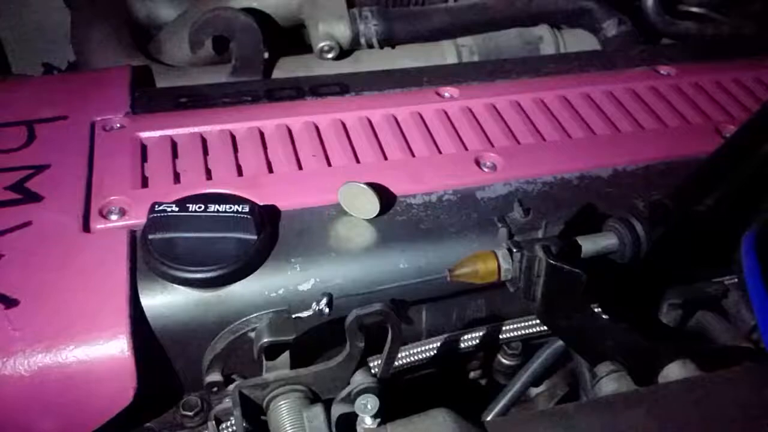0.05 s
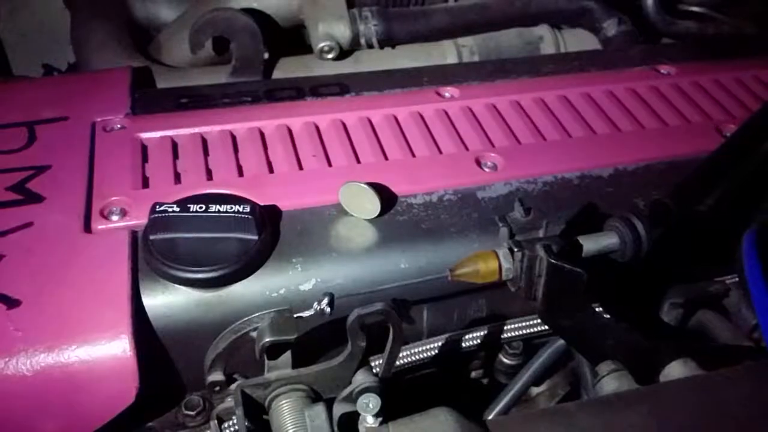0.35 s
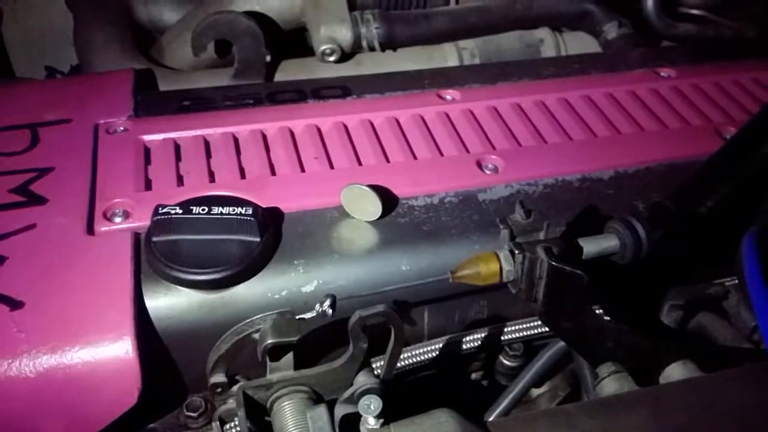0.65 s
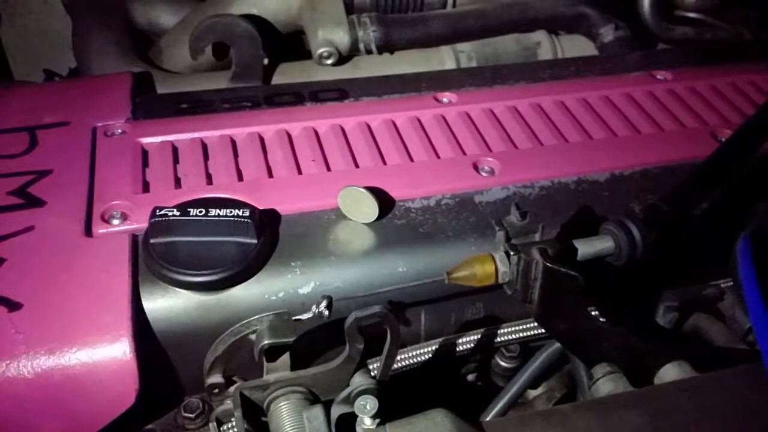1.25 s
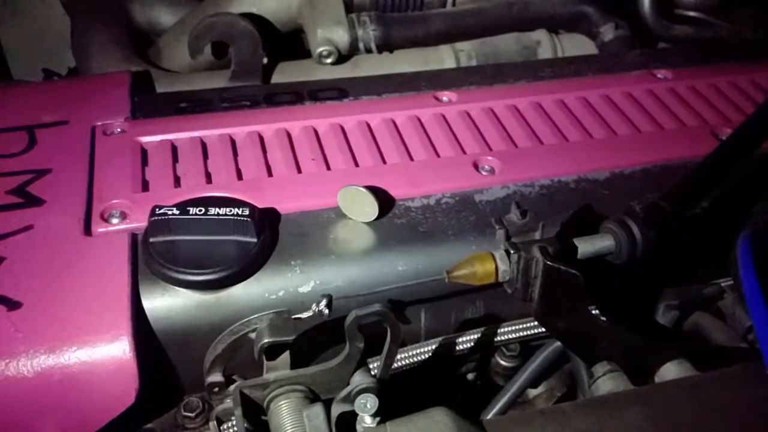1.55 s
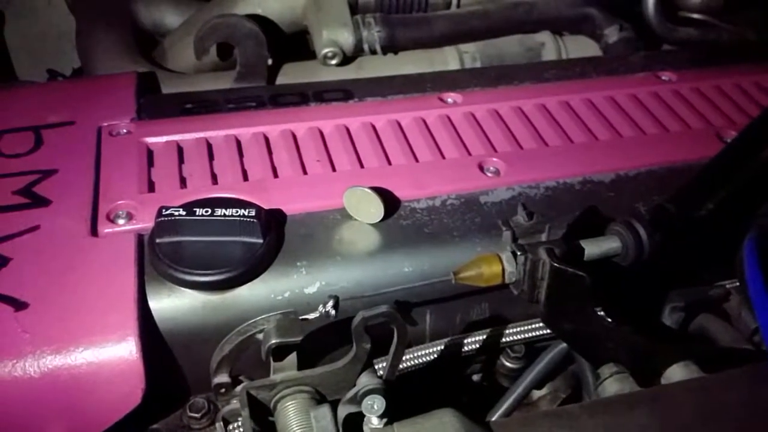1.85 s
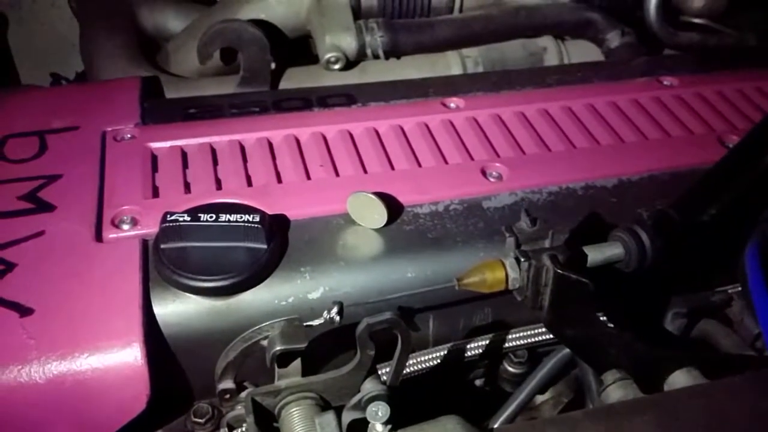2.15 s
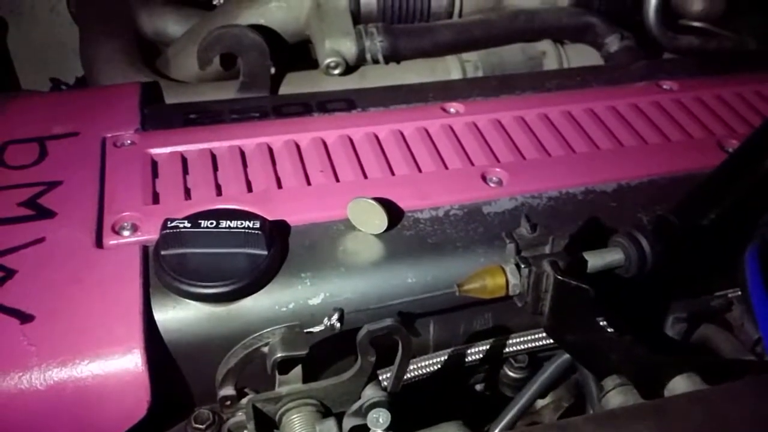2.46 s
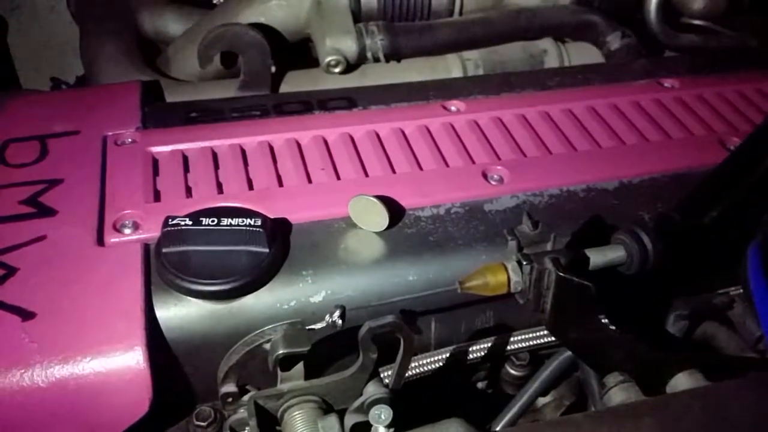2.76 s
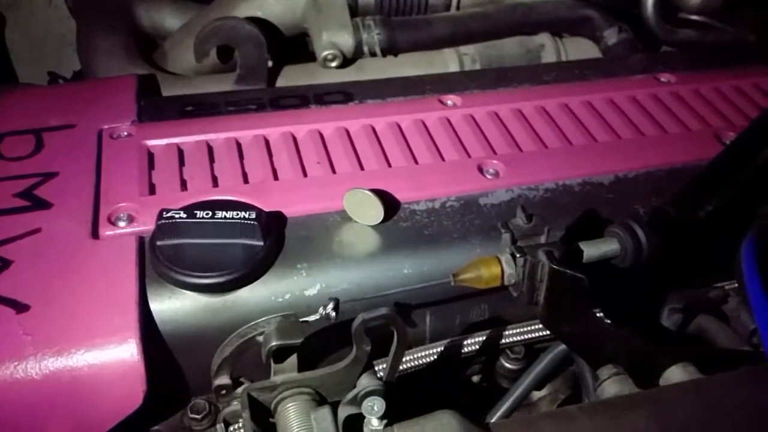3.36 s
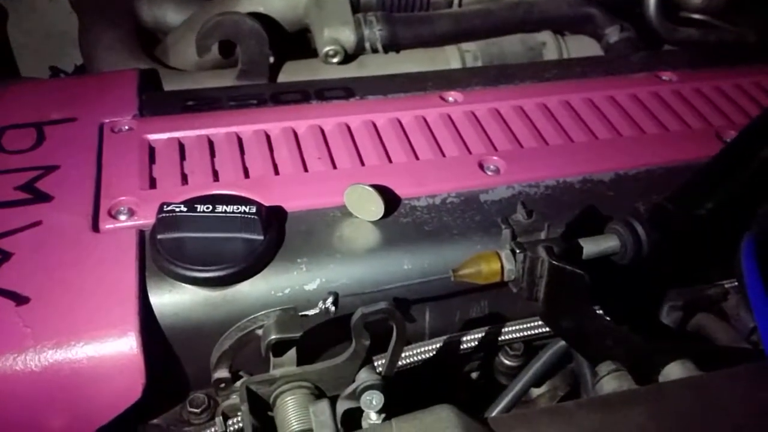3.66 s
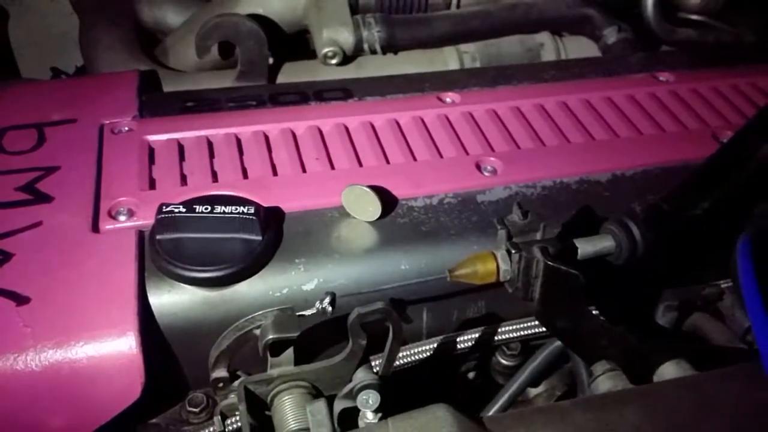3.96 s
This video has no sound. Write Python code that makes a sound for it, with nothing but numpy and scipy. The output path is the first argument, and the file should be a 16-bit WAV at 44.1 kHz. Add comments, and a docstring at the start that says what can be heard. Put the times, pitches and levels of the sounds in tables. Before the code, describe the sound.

A car engine idles, heard close under the open bonnet. It fades in over the first second, then holds a deep, pulsing rumble with rapid, regular sharp ticks. Behind these, valves clatter, a faint high sizzle comes and goes, and belts whine softly. At about 1.3 seconds a brief rasp swells and dies away. The engine keeps idling steadily until the end at 4 seconds.

```python
"""A six-cylinder petrol engine idles at about 660 rpm, heard close up under the open bonnet.
The sound fades in during the first second. From then on, firing pulses make a deep rumble, and three
different sharp ticks, probably injectors, take turns in every engine cycle (two turns of the crank).
Behind them the valves clatter, a faint sizzle comes and goes, and belt-driven parts whine softly.
At about 1.3 s a rasp swells briefly; the engine idles on to the end, at 4 s."""
import sys
import numpy as np
from scipy import signal
from scipy.fft import rfft, irfft
from scipy.io import wavfile
from scipy.ndimage import uniform_filter1d

SR = 44100
rng = np.random.default_rng(int(sys.argv[2]) if len(sys.argv) > 2 else 0)


def transcribe(u):
    """Save the signal u as a 16-bit wav file named by the first command-line argument.

    u: samples, shape (n,) or (channels, n), limited to [-1, 1]; the rate is SR.
    q: integer samples, one column per channel.
    """
    v = np.clip(np.atleast_2d(u).T, -1, 1)
    q = np.round(v * 32767).astype(np.int16)
    wavfile.write(sys.argv[1], SR, q)


N = 176400
TIME_S = np.arange(N) / SR
FREQS_HZ = np.fft.rfftfreq(N, 1 / SR)


def amp(db):
    """Turn decibels into a gain."""
    return 10 ** (np.asarray(db) / 20)


def unit(x):
    """Scale a signal to an average strength (rms) of 1."""
    return x / np.sqrt(np.mean(x ** 2) + 1e-20)


def gain_at(colour, hz):
    """Look up the gain at a pitch in a table of pitch_hz, level_db."""
    pitches, db = np.transpose(colour)
    return amp(np.interp(np.log(np.maximum(hz, 1)), np.log(pitches), db))


def over_time(points):
    """Join points in time with straight lines."""
    return np.interp(TIME_S, *np.transpose(points))


def noise(colour):
    """Noise with the given colour, its balance of low and high pitches."""
    return unit(irfft(rfft(rng.standard_normal(N)) * gain_at(colour, FREQS_HZ), N))


def drift(rate_hz):
    """A smooth random wobble, mostly slower than rate_hz."""
    return unit(irfft(rfft(rng.standard_normal(N)) * (FREQS_HZ > 0) / (1 + (FREQS_HZ / rate_hz) ** 4), N))


def clicks(times, gains):
    """One tiny click at each time."""
    out = np.zeros(N)
    out[np.clip((times * SR).astype(int), 0, N - 1)] = gains
    return out


def stereo(mid, side):
    """Make left and right from what they share (mid) and what sets them apart (side)."""
    return np.array([mid + side, mid - side])


# How wide the sound is: pitch_hz, side_over_mid_db
STEREO_WIDTH = [(60, -60), (130, -47), (400, -46), (1000, -41), (1900, -52), (2800, -29.5), (4000, -12.5),
                (6000, -7), (9000, -7), (14000, -0.5)]

def wide_noise(colour):
    """Stereo noise that widens towards the treble."""
    side = irfft(rfft(noise(colour)) * gain_at(STEREO_WIDTH, FREQS_HZ), N)
    return stereo(noise(colour), side)


# When each engine cycle begins: start_s
CYCLE_STARTS = [(0.0466), (0.2278), (0.4091), (0.5891), (0.769), (0.95), (1.131), (1.3129), (1.4936),
                (1.6747), (1.8535), (2.0338), (2.2149), (2.3954), (2.5759), (2.7565), (2.9368), (3.1181),
                (3.2975), (3.4778), (3.6598), (3.8396), (4.0205)]
CYLINDERS = 6

def count_firings():
    """How many firings have gone by at each moment; every cylinder fires once a cycle."""
    return CYLINDERS * np.interp(TIME_S, CYCLE_STARTS, np.arange(len(CYCLE_STARTS)))


def each_cycle(place):
    """The times when the engine passes one place in its cycle, counted in firings from 0 to 6."""
    cycles = np.arange(len(CYCLE_STARTS))
    times = np.interp(cycles + place / CYLINDERS, cycles, CYCLE_STARTS)
    return times[(times > CYCLE_STARTS[0]) & (times < N / SR - .01)]


def bumps(place, half_s):
    """A smooth rise and fall around the same place in every cycle."""
    times = each_cycle(place)
    nearest = times[np.searchsorted((times[1:] + times[:-1]) / 2, TIME_S)]
    return np.exp(-((TIME_S - nearest) / half_s) ** 2)


# Tones of the belt-driven parts: pitch_hz, level_db, wobble_share, roughness_hz
BELT_TONES = [(399, -47.5, .003, 5), (801, -51, .004, 6), (915, -48.5, .001, 3), (1146, -53.5, .003, 4),
              (1954, -44, .004, 7), (2697, -47, .002, 6), (2985, -46, .004, 22), (3666, -53, .002, 12),
              (5472, -52, .0004, 3)]

def belt_whines():
    """Thin, rough tones that wobble together with the speed of the belt."""
    belt, out = drift(3.544), 0
    for hz, db, wobble, roughness_hz in BELT_TONES:
        pitch_hz = hz * (1 + wobble * belt) + roughness_hz * drift(39.6)
        tone = np.sin(2 * np.pi * np.cumsum(pitch_hz) / SR)
        out = out + amp(db) * unit(tone * (1 + .29 * drift(21)))
    return out


# Colour of the sizzle: pitch_hz, level_db
SIZZLE_COLOUR = [(7000, -30), (8200, 2), (9300, -0.5), (10200, 1.5), (10700, -16)]
# Its bursts in each cycle: place_firings, level_db
SIZZLE_BURSTS = [(.45, -44), (1.5, -42.5), (2.45, -48), (3.52, -42.5), (5.45, -45.5)]

def sizzle():
    """Faint bursts of high hiss between the ticks."""
    level = sum(amp(db) * bumps(place, half_s=.0072) for place, db in SIZZLE_BURSTS)
    return level * wide_noise(SIZZLE_COLOUR)


# Colour of the rasp: pitch_hz, level_db
RASP_COLOUR = [(1500, -25), (1900, -5), (2200, 2), (2500, -10), (3000, -12), (4000, -26)]

def rasp(peak_s=1.295, half_s=.056, level_db=-33):
    """A mid-pitched rasp swells once and dies away."""
    return amp(level_db) * np.exp(-((TIME_S - peak_s) / half_s) ** 2) * noise(RASP_COLOUR)


# Colour of the rattling cams and valves: pitch_hz, level_db
RATTLE_COLOUR = [(400, -13), (520, -15), (640, -3.5), (800, -3.5), (1050, -9), (1400, -11.5), (1750, -8.5),
                 (1950, -3), (2170, -3.5), (2290, -6), (2700, 0.5), (3000, 0.5), (3300, -5), (3700, -4),
                 (4300, -7.5), (4700, -11.5), (5200, -8.5), (5500, -9.5), (5800, -4.5), (6150, -13.5),
                 (6600, -12), (8000, -19), (9500, -21), (11000, -24), (13000, -23.5), (15500, -19.5)]
# Colour of one valve tap: pitch_hz, level_db
VALVE_TAP_COLOUR = [(600, -28), (1500, -22.5), (2200, -5), (2800, 0), (4200, 0.5), (5500, -9.5), (8500, -5),
                    (11000, -21), (15000, -19)]
# Valve taps in each cycle: place_firings, strength, half_length_s
VALVE_TAPS = [(.08, 1, .0015), (.95, 0.74, 0.00075), (1.05, 0.3, 0.0012), (2.06, 0.84, 0.0033),
              (2.55, 0.17, 0.0006), (3.0, 0.24, .003), (3.88, 0.63, 0.0025), (4.96, 0.61, 0.0018),
              (5.45, 0.41, .001), (5.84, 0.53, 0.0025)]

def valve_clatter(firings, rattle_db=-29, tap_db=-24.5):
    """Cams and valves rattle, a little louder with each firing, and single taps stand out."""
    pulse = 1 + .083 * np.cos(2 * np.pi * firings)
    rattle = pulse * amp(rattle_db + drift(210)) * wide_noise(RATTLE_COLOUR)
    taps = sum(strength * bumps(place, half_s) for place, strength, half_s in VALVE_TAPS)
    return rattle + taps * amp(tap_db + 3 * drift(8.5)) * wide_noise(VALVE_TAP_COLOUR)


# The tones that ring in each of the three ticks: pitch_hz, level_db
FIRST_TICK = [(2110, -13.5), (2713, -9), (3704, -0.7), (4264, -0.4), (5125, -10), (6589, -14.5),
              (7494, -7.5), (8226, -6), (9001, -6.5), (9302, -14.5), (13049, -15.5), (13609, -23),
              (14427, -10.5), (15116, -15), (15590, -25)]
SECOND_TICK = [(2153, -13), (2713, -7.2), (3618, -15.5), (3962, -19), (4264, -15), (4910, -14), (5857, -24),
               (6589, -8.5), (7407, -10), (7967, -6), (8829, -12.5), (9561, -44), (12791, -20),
               (13480, -38), (15375, -22.4)]
THIRD_TICK = [(2196, -14), (2756, -6), (3230, -19), (3531, -7), (3833, -14.5), (4393, -3.3), (5125, -5),
              (5728, -11.5), (6029, -19.5), (6891, -23), (7321, -26), (7967, -13.5), (8570, -9.5),
              (9044, -16), (9345, -28)]
# The ticks in turn: place_firings, level_db, lead_in_db, snap_db, rebound_after_s, rebound_db
TICK_TURNS = [(-.012, -13, -7, -25.5, .0052, -17), (1.985, -13.8, -4, -33, .0085, -13),
              (3.998, -13, -9, -34, .0085, -13)]
# Colour of the dry snap as parts meet: pitch_hz, level_db
SNAP_COLOUR = [(2500, -30), (5000, -10), (6500, -6), (9000, 4.5), (10500, -5), (12000, -13), (14200, 5),
               (15800, 0)]

def ticks(lead_s=.0013, ring_s=.009, path_spread_s=.0003):
    """A lead-in click, a main click and a weak rebound set small parts ringing, with a snap on top."""
    out, early = 0, SR // 200  # the snap starts this many samples early
    hiss = wide_noise(SNAP_COLOUR)
    t = np.arange(-early, SR // 25) / SR
    snap_shape = np.exp(-(t / .0015) ** 2) + .37 * (t > 0) * np.exp(-np.abs(t) / .0067)
    for n, tones in enumerate((FIRST_TICK, SECOND_TICK, THIRD_TICK)):
        place, level_db, lead_db, snap_db, rebound_s, rebound_db = TICK_TURNS[n]
        times = each_cycle(place)
        force = amp(.5 * rng.standard_normal(len(times)))
        snap = amp(snap_db) * snap_shape * hiss[:, n * len(t):(n + 1) * len(t)]
        out = out + signal.fftconvolve(clicks(times, force)[None], snap)[:, early:early + N]
        for k, (hz, db) in enumerate(tones):
            main, lead, rebound = force * amp(level_db + .7 * rng.standard_normal((len(times), 3)).T)
            arrivals = times + path_spread_s * rng.uniform(-1, 1)  # each tone takes its own path
            ahead_s = np.round(lead_s * hz) / hz  # whole waves, so the two clicks ring in step
            blows = clicks(arrivals, main) + clicks(arrivals - ahead_s, lead * amp(lead_db))
            blows += clicks(arrivals + rebound_s, rebound * amp(rebound_db))
            # each blow starts a tone that drops 60 dB in ring_s
            ring_step = amp(-60 / (ring_s * SR)) * np.exp(2j * np.pi * hz / SR)
            ring = amp(db) * signal.lfilter([1], [1, -ring_step], blows + 1e-18)
            out = out + stereo(ring.imag, ring.real * gain_at(STEREO_WIDTH, hz) * (-1) ** k)
    # small parts give off little sound below 1520 Hz
    return signal.sosfilt(signal.butter(2, 1520, "high", fs=SR, output="sos"), out)


# Colour of the burning fuel's dull noise: pitch_hz, level_db
THUD_COLOUR = [(20, -38), (34, -32), (42, -14), (52, 3), (85, 1.5), (120, 6.5), (170, -3.5), (240, -5.5),
               (340, -1.5), (420, -3), (520, -20), (800, -35)]

def combustion_thud(firings, level_db=-31.5):
    """Burning fuel makes a dull noise that puffs with each firing."""
    puff = 1 + .21 * np.cos(2 * np.pi * (firings - .63))
    return amp(level_db) * unit(wide_noise(THUD_COLOUR) * puff)


# The deep boom at twice the firing rate: time_s, level_db
BOOM_LEVELS = [(0.9, -23.5), (1.0, -33), (1.1, -20), (1.33, -27), (1.62, -21), (1.72, -44), (1.8, -20.5),
               (1.98, -28.5), (2.03, -21.5), (2.27, -28.5), (2.36, -18.5), (2.46, -34), (2.5, -23.5),
               (2.67, -30.5), (2.74, -17.5), (2.95, -32), (3.01, -23), (3.31, -29.5), (3.6, -21),
               (3.66, -31), (3.96, -18.5), (4.0, -22)]
# The tones at 3, 4, 5... times the firing rate: level_db
OVERTONE_LEVELS = [-24.5, -31, -40.5, -44.5, -43.5, -46.5, -54]
# Hollow spaces that delay the firing pulse: pitch_hz, width_hz
HOLLOWS = [(66, 8), (110, 8.4)]

def firing_rumble(firings, pulse_place=.7916, sway_rad=.2):
    """Slightly uneven firing pulses make a stack of low tones, each delayed by the hollow spaces."""
    firing_hz = np.mean(np.diff(firings)) * SR
    boom_db = uniform_filter1d(over_time(BOOM_LEVELS), size=SR // 25)
    overtones_db = [db + 1.33 * drift(3.5) for db in OVERTONE_LEVELS]
    out = 0
    for multiple, db in enumerate([boom_db] + overtones_db, 2):
        tone_hz = multiple * firing_hz
        lag = sum(np.arctan2(tone_hz * width, hz ** 2 - tone_hz ** 2) for hz, width in HOLLOWS)
        phase = 2 * np.pi * multiple * (firings - pulse_place) - lag + sway_rad * drift(3.4)
        out = out + np.sqrt(2) * amp(db) * np.cos(phase)
    return out * amp(.8 * drift(12))


def scene():
    """The whole engine, turning on one crankshaft."""
    firings = count_firings()
    low_end = firing_rumble(firings) + combustion_thud(firings)
    return amp(-.5) * (low_end + valve_clatter(firings) + sizzle() + rasp() + belt_whines() + ticks())


# The fade-in: time_s, level_db
FADE_IN = [(.145, -55), (.17, -29), (.55, -14.5), (.84, -3.5), (.95, 1)]

def record(dry, cutoff_hz=15750):
    """After a moment of silence the sound fades in; the highest treble is cut away."""
    fade = amp(over_time(FADE_IN)) * (TIME_S > FADE_IN[0][0])
    treble_cut = signal.ellip(12, .1, 90, cutoff_hz, fs=SR, output="sos")
    return signal.sosfilt(treble_cut, np.clip(dry * fade, -1, 1))


dry = scene()
out = record(dry)
transcribe(out)
```